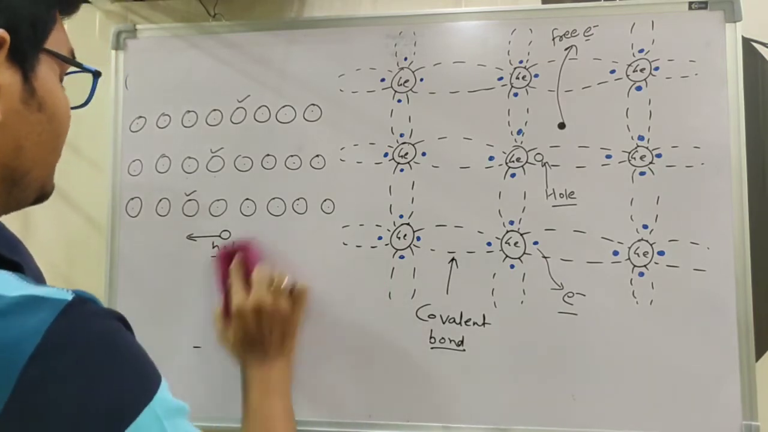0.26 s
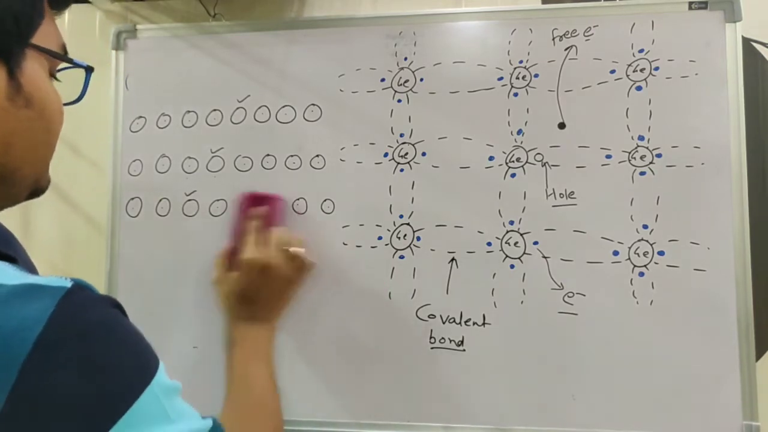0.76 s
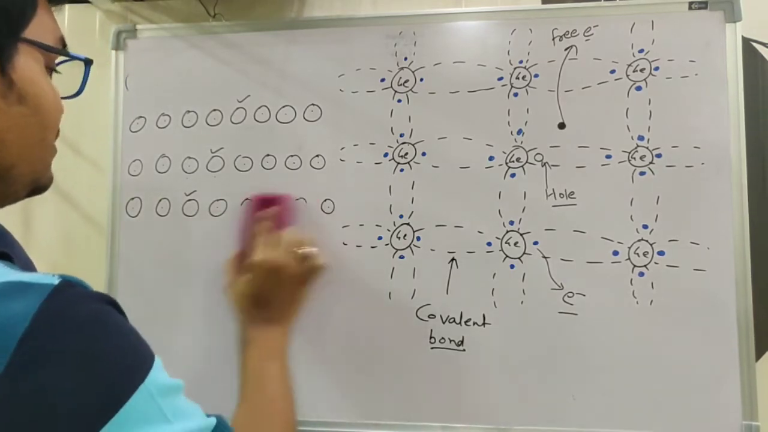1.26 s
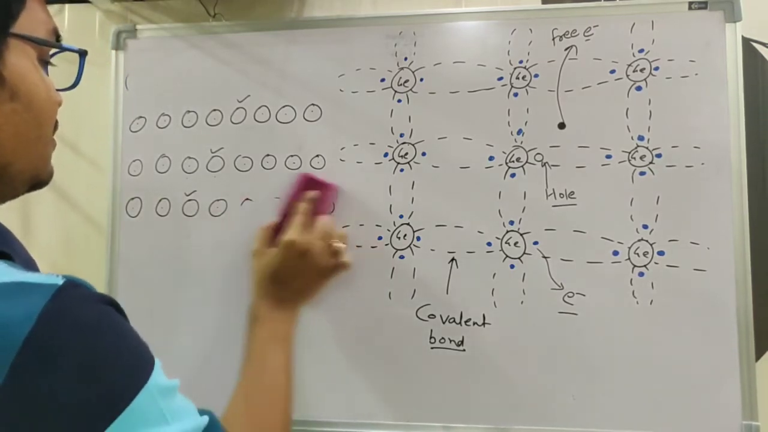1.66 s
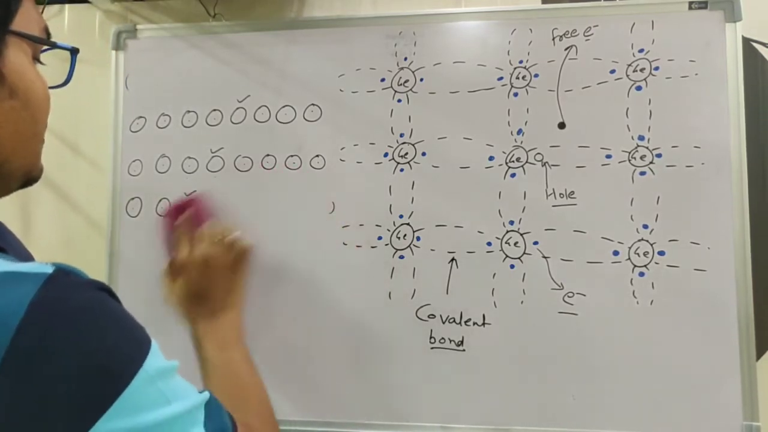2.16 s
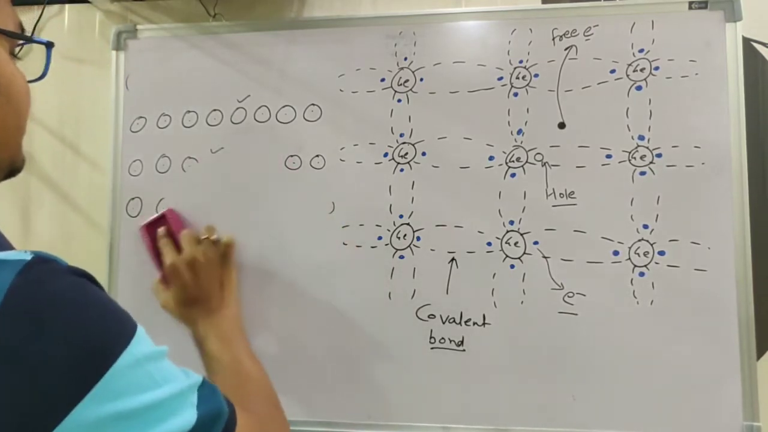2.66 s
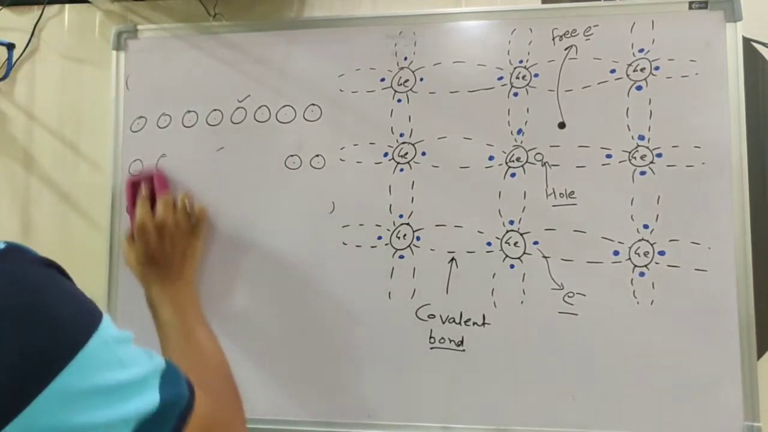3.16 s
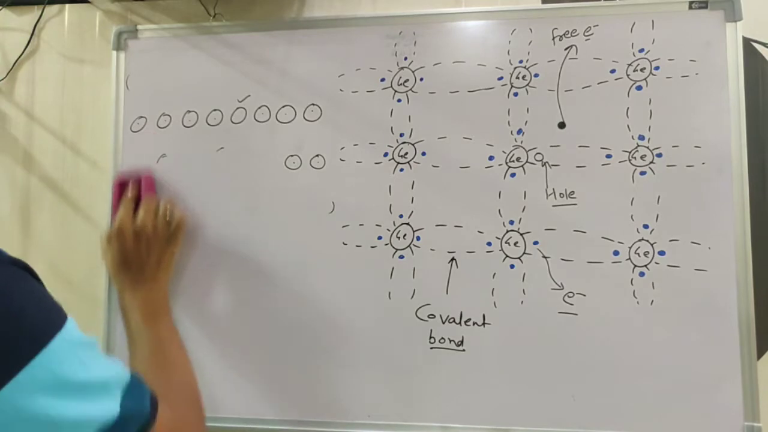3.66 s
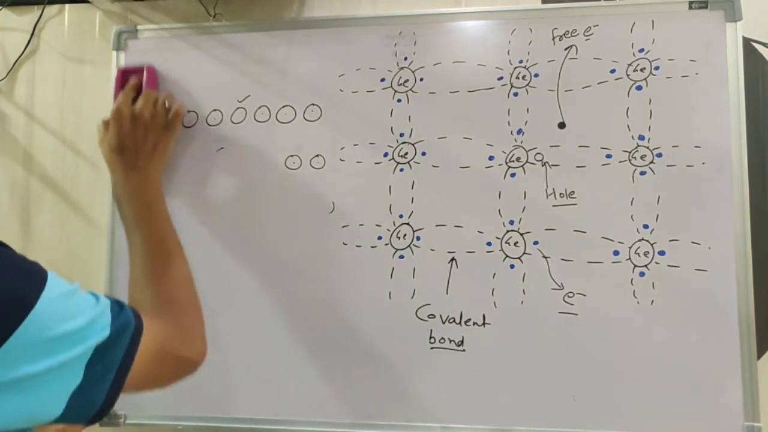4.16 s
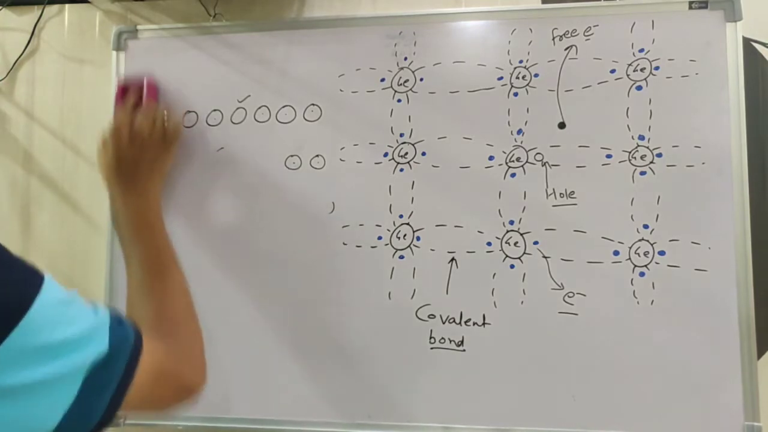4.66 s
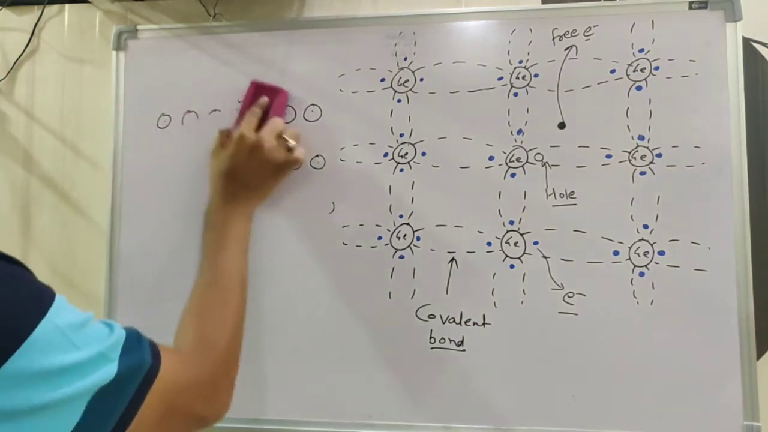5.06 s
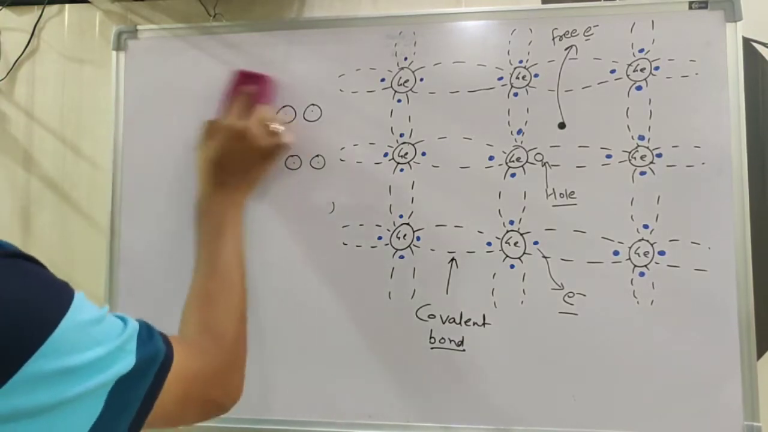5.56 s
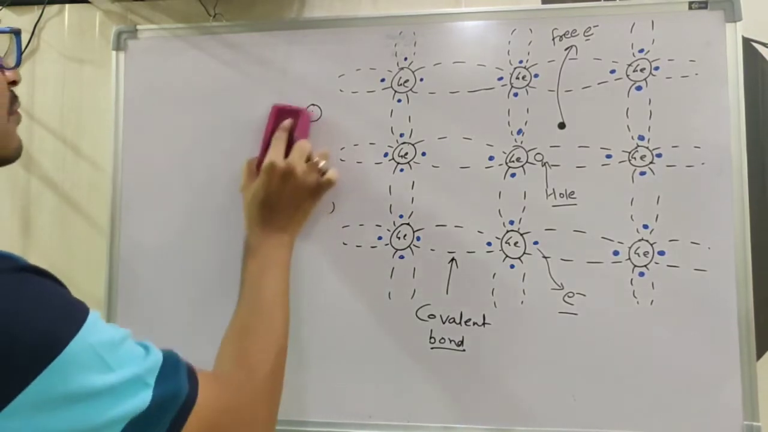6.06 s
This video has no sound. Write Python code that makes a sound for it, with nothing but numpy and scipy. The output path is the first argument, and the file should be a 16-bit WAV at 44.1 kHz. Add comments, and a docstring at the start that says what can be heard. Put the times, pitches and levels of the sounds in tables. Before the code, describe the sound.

Brisk dry rubbing of a felt eraser on a rumbling whiteboard, with a few hollow knocks and scuffs, in a small room with a fan.

```python
"""A felt eraser hisses back and forth over a whiteboard in a small classroom with a fan running.
The felt fibres catch and slip, so the hiss follows the speed of the hand and the panel rumbles.
The loose board knocks against the wall; the eraser scuffs and clacks on the frame and its felt grabs.
The fan is a rush of air with a few wavering tones. A microphone close by hears it all in mono."""
import sys
import numpy as np
from scipy import signal
from scipy.fft import rfft, irfft, next_fast_len
from scipy.io import wavfile
from scipy.ndimage import uniform_filter1d

SR = 44100
rng = np.random.default_rng(int(sys.argv[2]) if len(sys.argv) > 2 else 0)


def persist_wave(psi):
    """Save psi, clipped to +-1, as 16-bit WAV."""
    counts = np.round(np.clip(psi, -1, 1) * 32767).astype(np.int16)
    wavfile.write(sys.argv[1], SR, np.atleast_2d(counts).T)


N = 277379
TIME = np.arange(N) / SR

# The pitches at which the loose board rings, shared by the rumble and the knocks.
# Each row: pitch in Hz, relative level in dB, time to fade by 60 dB in seconds.
BOARD_MODES = [(161, -7.5, 0.11), (355, -19.5, 0.11), (390, -10, 0.12), (473, -9.5, 0.083), (480, -7, 0.1),
               (568, 0.5, 0.054), (680, -3, 0.13), (716, -6.5, 0.097), (761, -13, 0.061), (844, -10.5, 0.1),
               (887, -17, 0.075), (970, -18, 0.08)]


def undb(db):
    """Turn decibels into a gain."""
    return 10 ** (np.asarray(db) / 20)


def unit(x):
    """Scale a sound to an rms level of 1."""
    return x / np.sqrt(np.mean(x ** 2))


def colour(x, points):
    """Shape the spectrum of x through points of (Hz, dB), then scale to rms 1."""
    hz, db = np.transpose(points)
    size = 2 * next_fast_len(N)
    f = np.maximum(np.fft.rfftfreq(size, 1 / SR), 1)
    gain = undb(np.interp(np.log(f), np.log(hz), db))
    return unit(irfft(rfft(x, size) * gain)[:N])


def walk(rate):
    """Slow random drift at rms 1: levels held for 1 / rate seconds, then smoothed twice."""
    hold = max(int(SR / rate), 1)
    steps = np.repeat(rng.standard_normal(N // hold + 1), hold)
    smooth = uniform_filter1d(uniform_filter1d(steps, hold), hold)
    return unit(smooth)[:N]


def slips(per_s, scatter_db):
    """Tiny clicks of uneven size at random moments; denser means smoother, at the same power."""
    chance, size = rng.random(N), rng.standard_normal(N)
    clicks = (chance < per_s / SR) * np.sign(size) * undb(scatter_db * np.abs(size))
    return unit(clicks / np.sqrt(per_s))


def ring(x, modes):
    """Push with the force x on modes (Hz, dB, fade time) that each ring and die away."""
    t = TIME[:SR]
    response = sum(undb(db - 60 * t / t60) * np.sin(2 * np.pi * hz * t) for hz, db, t60 in modes)
    return signal.fftconvolve(x, response)[:N]


def hand():
    """Each stroke speeds up and slows in an arch; gives speed, hiss and rasp in dB."""
    # Strokes of the hand, each lasting until the next begins; the weakest are hesitations.
    # Each row: start in seconds, share of speed kept in the turn (0 stops, 1 loops round at speed),
    # felt hiss level in dB, dry rasp level in dB, both before the speed and trims act on them.
    strokes = [(-.08, 0.4, -43.5, -48), (.13, 0.82, -44, -46), (.295, 0.26, -40.5, -41),
               (.52, 0.67, -43.5, -43.5), (.69, 0.74, -42.5, -45), (.885, 0.75, -42.5, -45),
               (1.15, 0.63, -42, -45.5), (1.34, 0.65, -43, -46.5), (1.525, 0.77, -43, -47),
               (1.765, 0.42, -43.5, -46.5), (1.97, 0.5, -43.5, -46), (2.11, 0.72, -44, -46.5),
               (2.35, 0.6, -44, -47.5), (2.57, 0.58, -44, -46), (2.78, 0.55, -43.5, -46.5),
               (3.01, 0.56, -44.5, -46.5), (3.22, 0.54, -43.5, -46), (3.43, 0.7, -52.5, -47.5),
               (3.475, 0.6, -43.5, -45.5), (3.699, 0.46, -42, -45.5), (4.0, 0.62, -51.5, -51),
               (4.19, 0.83, -46, -52.5), (4.28, 0.94, -44.5, -45), (4.501, 0.57, -43, -45),
               (4.665, 0.62, -42.5, -46), (4.929, 0.66, -43.5, -46.5), (5.17, 0.38, -43, -46),
               (5.43, 0.74, -43.5, -46.5), (5.64, 0.42, -43, -47), (5.86, 0.9, -42.5, -47.5),
               (6.12, 0.64, -50.5, -50), (6.19, 0.73, -44, -47.5)]
    last_stroke_s, grip_change_s = 0.25, 0.037
    arch = 0.85  # smaller flattens the middle of a stroke

    start, turn_speed, hiss_db, rasp_db = np.transpose(strokes)
    edges = np.append(start, start[-1] + last_stroke_s)
    progress = np.interp(TIME, edges, np.arange(len(start) + 1))
    kept = np.interp(TIME, start, np.clip(turn_speed, 0.05, 1))
    speed = kept + (1 - kept) * np.abs(np.sin(np.pi * progress)) ** arch
    # the grip changes smoothly from one stroke to the next
    stroke = np.minimum(progress.astype(int), len(start) - 1)
    eased = [uniform_filter1d(db[stroke], int(grip_change_s * SR)) for db in (hiss_db, rasp_db)]
    return 20 * np.log10(speed), *eased


def felt(speed_db, hiss_db, rasp_db):
    """Fibres slip more often and louder in a fast stroke; patches of ink make the friction uneven."""
    # Spectrum of the felt's hiss. Each row: pitch in Hz, level in dB per Hz.
    hiss_spectrum = [(1200, -17.5), (3000, -10.5), (4500, -7), (5600, -3.5), (6300, 1.5), (6900, -7.5),
                     (7500, -14.5), (8050, -24.5), (10000, -27), (15500, -30)]
    # Spectrum of its dry rasp. Each row: pitch in Hz, level in dB per Hz.
    rasp_spectrum = [(500, -7.5), (1000, -0.5), (1300, -1), (2000, -1), (2600, -2), (3200, 0), (4500, -4.5),
                     (7000, -10), (8200, -36)]
    hiss_law, rasp_law = 1.19, 0.59  # dB gained per dB of hand speed

    per_s = 17000 * undb(speed_db + hiss_db - np.median(hiss_db))
    patches_db = 0.5 * walk(rate=66) + 0.46 * walk(rate=22)
    # the hiss fades faster than the rasp when the hand slows to turn
    hiss_gain = undb(hiss_db + hiss_law * speed_db - 0.4)
    rasp_gain = undb(rasp_db + rasp_law * speed_db - 1.23)
    hiss = colour(slips(per_s, scatter_db=2.5), hiss_spectrum) * hiss_gain
    rasp = colour(slips(per_s, scatter_db=2.5), rasp_spectrum) * rasp_gain
    return (hiss + rasp) * undb(patches_db)


def panel(speed_db):
    """The dragging eraser judders: the panel rumbles and its modes sing through by turns."""
    # How hard the eraser shakes the panel.
    # Each row: time in seconds, level in dB before the speed and mix act on it.
    press = [(0, -44), (.29, -41.5), (.44, -39), (.78, -40.5), (1.15, -40.5), (1.95, -43.5), (2.25, -42),
             (2.5, -42), (3.45, -41.5), (3.97, -42), (4.17, -47.5), (4.3, -38.5), (4.43, -36),
             (4.52, -39.5), (4.78, -39), (4.95, -41), (5.5, -41), (6.08, -42), (6.28, -44.5)]
    # Spectrum of the rumble. Each row: pitch in Hz, level in dB per Hz.
    rumble_spectrum = [(60, -35), (110, 1.5), (150, -2), (250, 4), (380, 2), (440, -10), (520, -3.5),
                       (620, -8.5), (740, -7.5), (810, -1.5), (1020, -8.5), (1200, -27), (2500, -46)]
    rumble_law = 0.13  # dB gained per dB of hand speed
    node_db, node_rate = 3, 5  # each mode's swell in dB rms, changes per second

    press_db = np.interp(TIME, *np.transpose(press))
    rumble = colour(slips(per_s=7000, scatter_db=1.5), rumble_spectrum)
    judder = slips(per_s=2500, scatter_db=1.5)
    singing = np.zeros(N)
    for mode in BOARD_MODES:
        # a mode swells and fades as the eraser slides over its still points
        swell = undb(node_db * walk(rate=node_rate))
        singing += ring(judder * swell, [mode])
    mix = undb(-1) * rumble + undb(-12) * unit(singing)
    return mix * undb(press_db + rumble_law * speed_db + 0.8 * walk(rate=29))


def scuffs():
    """The eraser brushes the frame or skids on its edge: a grainy swish and a wavering whistle."""
    # Each row: peak time in seconds, swish level in dB, rise in seconds, fall in seconds,
    # whistle pitch in Hz, whistle level in dB relative to the swish.
    scuff_events = [(.205, -49, .018, 0.015, 6260, -3), (3.481, -39, .002, .004, 6100, -5),
                    (3.497, -46, .005, .02, 6100, 0), (3.59, -45.5, .035, .03, 6400, -10),
                    (4.320, -28, 0.021, 0.012, 6460, -11), (4.381, -41.5, .007, 0.021, 6100, 0),
                    (4.421, -44.5, 0.013, 0.031, 6080, 0), (4.555, -50.5, .012, .015, 6200, 0),
                    (4.635, -45, .025, .012, 6300, -2), (4.712, -49, .018, .025, 6500, 2),
                    (4.832, -44, .014, .025, 6120, -5)]
    # Spectrum of the swish. Each row: pitch in Hz, level in dB per Hz.
    swish_spectrum = [(60, -20), (130, 0), (400, -5.5), (880, -4), (1250, -14), (3000, -12.5), (4000, -6),
                      (4800, -0.5), (6400, 5), (7200, -4.5), (8200, -25), (15000, -36)]
    whistle_width_hz, whistle_wander = 320, 0.024  # wander is a share of the pitch, rms

    out = np.zeros(N)
    swish = colour(slips(per_s=4100, scatter_db=0), swish_spectrum)
    wander = 1 + whistle_wander * walk(rate=32)
    # slow complex noise, moved up to the whistle's pitch below, makes a narrow band
    narrow = signal.butter(2, whistle_width_hz / 2, fs=SR, output="sos")
    grain = signal.sosfilt(narrow, rng.standard_normal(N) + 1j * rng.standard_normal(N))
    for s, db, rise, fall, hz, whistle_db in scuff_events:
        width = np.where(TIME < s, rise, fall)
        swell = undb(db) * np.exp(-0.5 * ((TIME - s) / width) ** 2)
        phase = 2 * np.pi * np.cumsum(hz * wander) / SR
        whistle = unit(np.real(grain * np.exp(1j * phase)))
        out += swell * (swish + undb(whistle_db) * whistle)
    chatter = undb(0.73 * walk(rate=96))
    return out * chatter


def grabs():
    """A sudden burst of slips rings one resonance and dies away as the felt slides free."""
    # The felt grabs and sets the panel ringing or squeaks faintly.
    # Each row: start in seconds, level in dB, ring pitch in Hz,
    # ring's time to fade by 60 dB in seconds, burst's decay time in seconds.
    grab_events = [(.395, -37, 260, .03, 0.025), (.46, -39, 215, 0.065, 0.19), (1.04, -52, 3880, .01, .12),
                   (1.05, -46, 2270, .007, 0.09), (1.586, -42, 217, 0.044, 0.026),
                   (1.901, -41, 237, 0.014, 0.042), (2.04, -40, 257, 0.024, 0.032),
                   (2.16, -49.5, 4270, .06, 0.11), (2.19, -37, 220, 0.044, 0.044),
                   (2.27, -43, 125, 0.22, 0.072), (3.19, -50.5, 2680, .012, .08),
                   (3.28, -49.5, 3020, .008, 0.088), (3.478, -43, 2340, 0.0018, 0.11),
                   (3.706, -38.5, 168, 0.1, 0.062), (3.77, -39.5, 161, 0.09, 0.047),
                   (4.76, -39.5, 277, 0.097, 0.078), (6.02, -42, 153, 0.13, 0.082)]
    out = np.zeros(N)
    for s, db, hz, t60, decay in grab_events:
        ringing = ring(slips(per_s=2500, scatter_db=3.5), [(hz, 0, t60)])
        onset = np.clip((TIME - s) / 0.0021, 0, 1)
        burst = ringing * onset * np.exp(-np.abs(TIME - s) / decay)
        # even out chance: each burst gets the energy set by its level and decay
        out += undb(db) * burst * np.sqrt(decay * SR / 2) / np.linalg.norm(burst)
    return out


def knocks():
    """The board bumps the wall and chatters: short pushes, duller when the contact is longer."""
    # Each row: start in seconds, force in dB, contact time in milliseconds.
    bumps = [(0.3235, -24.5, 1.6), (0.3278, -20.5, 1.2), (0.3319, -23.5, 1.2), (0.3365, -18, 0.98),
             (0.3417, -28, 0.96), (0.3486, -32.5, 0.79), (0.3564, -40, 1.1), (0.3825, -29, 1.3),
             (0.3888, -34, 0.68), (0.4081, -28, 1.57), (.433, -33, 1.6), (.4585, -33, 1.3),
             (1.334, -25.5, 2.15), (1.338, -33.5, 1.3), (1.3426, -37.5, 1.1), (1.347, -32, 2.1),
             (1.5765, -33.5, 1.46), (1.585, -30, 2.2), (1.5924, -28.5, 2.6), (1.6881, -29, 1.44),
             (1.6917, -38, 1.1), (1.6957, -34.5, 1.54), (3.073, -31.5, 2), (4.298, -34.5, 1.8),
             (4.629, -36, 1.15)]
    # Spectrum of the thud. Each row: pitch in Hz, level in dB per Hz.
    thud_spectrum = [(60, -25), (130, -1), (280, -7), (400, 2), (600, 2), (950, 10), (1100, -12),
                     (2500, -32)]
    thud_db, thud_t60 = -20, 0.17  # level in dB, seconds to fade by 60 dB

    force = np.zeros(N)
    for s, db, contact_ms in bumps:
        push = np.sin(np.pi * np.clip((TIME - s) / (contact_ms / 1000), 0, 1)) ** 2
        force += undb(db) * push / push.sum()
    # the panel's crowd of weaker modes, as fading noise
    fade = np.exp(-np.log(1000) * TIME / thud_t60)
    thud = undb(thud_db) * colour(rng.standard_normal(N), thud_spectrum) * fade
    motion = ring(force, BOARD_MODES) + signal.fftconvolve(force, thud[:SR])[:N]
    # air slips round the panel's edge, so slow motion radiates little
    radiate = signal.butter(1, 220, "high", fs=SR, output="sos")
    return signal.sosfilt(radiate, -motion)


def clacks():
    """The eraser's hard shell hits the frame: an instant push makes the shell ring."""
    # Each row: time in seconds, force in dB.
    hits = [(3.479, -44), (3.4806, -42)]
    # The shell's ringing. Each row: pitch in Hz, level in dB, time to fade by 60 dB in seconds.
    shell_modes = [(2030, 0, .03), (2380, -4, .026), (2850, -2, .022), (3900, -3, .015), (6070, -1, .025)]
    force = np.zeros(N)
    for s, db in hits:
        force[int(s * SR)] += undb(db)
    return ring(force, shell_modes)


def classroom(x, wet_db, gap_s=0.0074):
    """The walls add a dense, dull tail that begins just after the direct sound."""
    room_t60, room_top_hz = 0.35, 2000  # seconds to fade by 60 dB; the walls absorb above this pitch
    t = TIME[:SR]
    fade = np.exp(-np.log(1000) * t / room_t60)
    tail = rng.standard_normal(SR) * fade * np.clip(t / gap_s - 1, 0, 1)
    absorb = signal.butter(1, room_top_hz, fs=SR, output="sos")
    echo = signal.sosfilt(absorb, tail / np.linalg.norm(tail))
    return x + undb(wet_db) * signal.fftconvolve(x, echo)[:N]


def fan():
    """A steady rush of air, as shaped noise, with a few wavering fan and motor tones."""
    # Spectrum of the moving air. Each row: pitch in Hz, level in dB per Hz.
    air_spectrum = [(25, -5), (50, -1), (70, -17), (84, 5.5), (100, -6), (135, -1), (260, -2), (500, -1.5),
                    (900, -9), (1300, -10), (6500, -27), (8200, -51), (15000, -38)]
    # The tones. Each row: middle pitch in Hz, middle level in dB rms.
    tones = [(84, -58), (145.5, -56.5), (194.5, -51), (251, -52)]
    out = colour(rng.standard_normal(N), air_spectrum) * undb(-44.5 + 0.66 * walk(rate=6.35))
    for hz, db in tones:
        phase = 2 * np.pi * np.cumsum(hz * (1 + 0.0063 * walk(rate=7))) / SR
        out = out + unit(np.sin(phase)) * undb(db + 2.73 * walk(rate=6))
    return out


def scene():
    """Rubbing, knocks and clacks echo in the room, over the fan; both channels are alike."""
    speed_db, hiss_db, rasp_db = hand()
    wiping = felt(speed_db, hiss_db, rasp_db) + panel(speed_db) + scuffs() + grabs()
    mono = classroom(wiping + knocks() + clacks(), wet_db=-11) + fan()
    return np.array([mono, mono])


def record(dry):
    """The recorder cuts the deep bass and the top."""
    low_hz, top_hz = 72.3, 15750
    bass_cut = signal.butter(4, low_hz, "high", fs=SR, output="sos")
    top_cut = signal.ellip(10, 0.1, 70, top_hz, fs=SR, output="sos")
    return signal.sosfilt(top_cut, signal.sosfilt(bass_cut, dry))


dry = scene()
out = record(dry)
persist_wave(out)
```